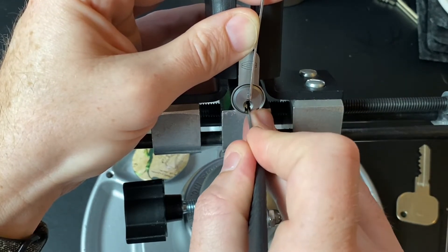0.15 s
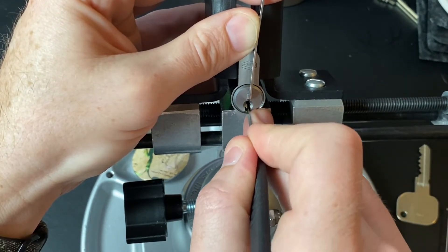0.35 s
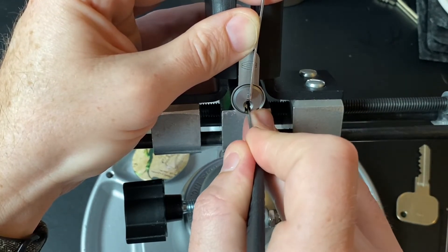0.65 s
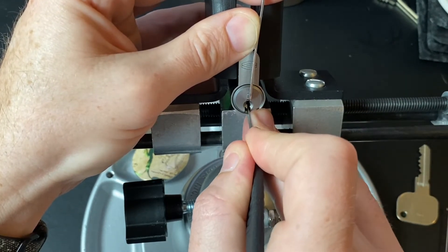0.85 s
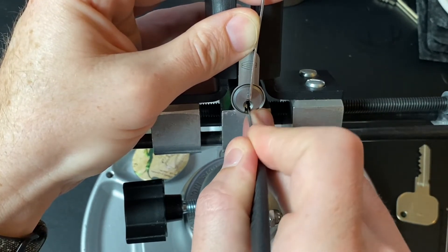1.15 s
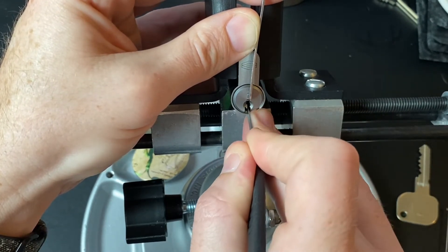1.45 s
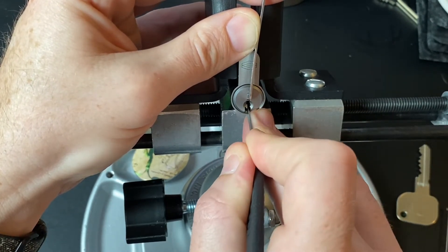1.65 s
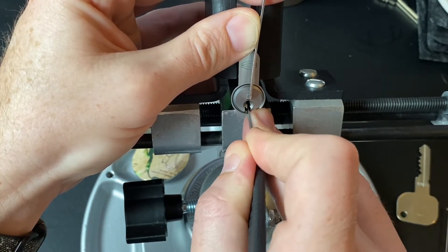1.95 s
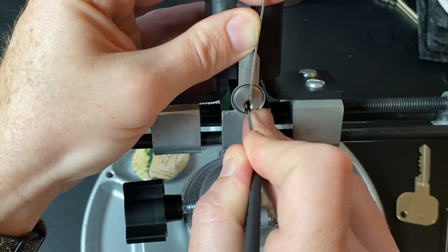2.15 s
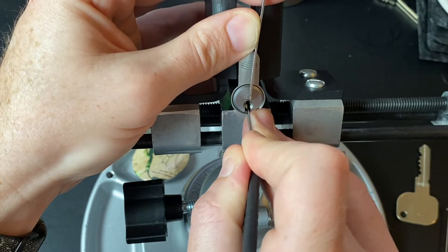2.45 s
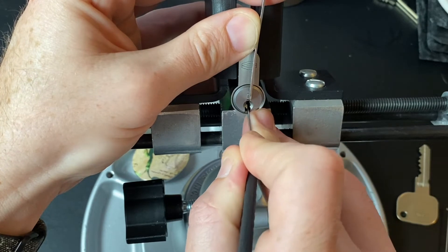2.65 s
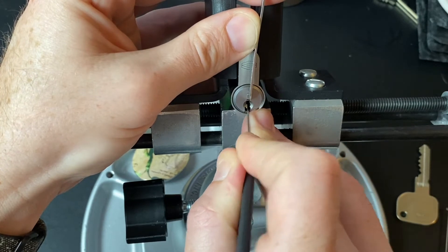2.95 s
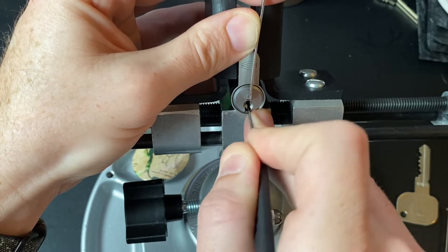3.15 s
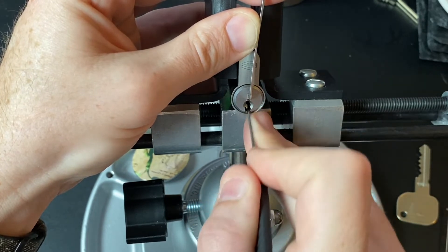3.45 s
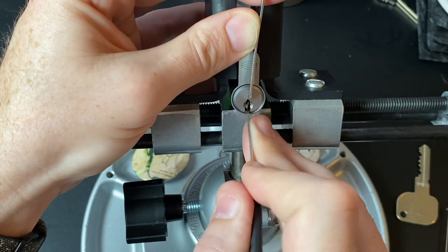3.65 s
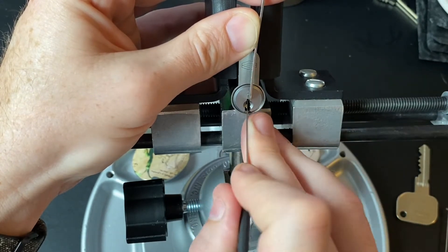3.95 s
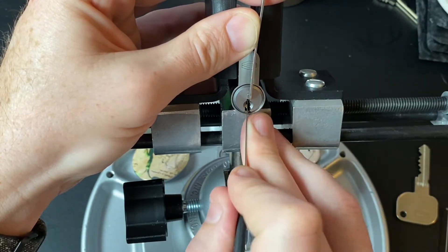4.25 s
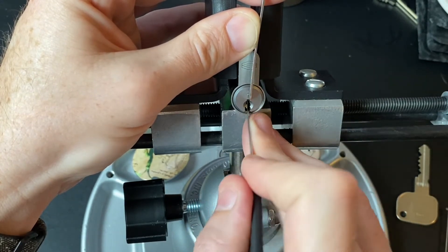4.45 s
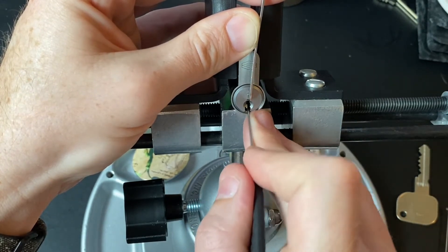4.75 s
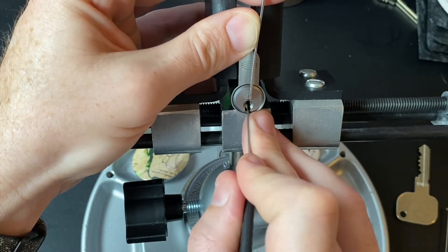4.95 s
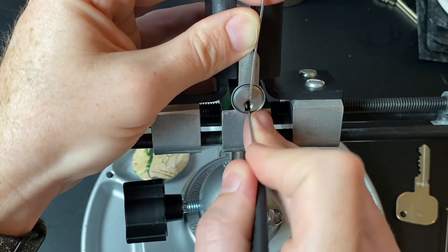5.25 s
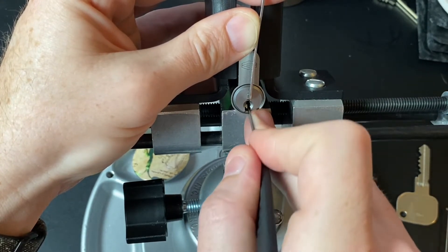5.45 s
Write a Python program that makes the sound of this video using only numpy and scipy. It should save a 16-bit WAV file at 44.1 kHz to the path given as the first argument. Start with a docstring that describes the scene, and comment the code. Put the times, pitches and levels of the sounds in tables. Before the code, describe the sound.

Over a faint fluttering fan-like motor hum, fingers softly bump and slide while a pick touches lock pins. A small crisp snap comes before the middle, then a single dominant metallic clack with a low woody thump. Afterwards come scattered tiny ticks, a light cluster of clicks, and a last modest click near the end. Recorded close in a small, fairly dry room, in stereo.

```python
"""Workbench in a small room: a pick works the pins of a lock cylinder clamped in a small vice.
Faint ticks, a small snap, one loud click as a pin sets, then more ticks: noise cracks and rattles over
swelling steel modes. Three jolts ring vice and bench; fingers slide and bump as shaped noise.
Behind, a small motor, probably a fan, hums as filtered noise. It ticks and pips on every turn,
knocks on every fifth, and slowly hunts in speed."""
import sys
import numpy as np
from scipy import signal
from scipy.fft import rfft, irfft
from scipy.io import wavfile

SR = 44100
rng = np.random.default_rng(int(sys.argv[2]) if len(sys.argv) > 2 else 0)


def digitize_waveform(pressure):
    """Quantize a signal to 16-bit integers and store it at the path in sys.argv[1].

    Rows of a 2-D input are taken as channels; values are limited to [-1, 1].
    """
    field = np.atleast_2d(pressure).T
    bounded = np.clip(field, -1, 1)
    quanta = np.round(bounded * 32767).astype(np.int16)
    wavfile.write(sys.argv[1], SR, quanta)


N = 246519
TIME = np.arange(N) / SR
HZ = np.fft.rfftfreq(N, 1 / SR)


def from_db(db):
    """Decibels to amplitude gain."""
    return 10 ** (np.asarray(db) / 20)


def rms_one(x):
    """Scale to unit rms."""
    return x / np.sqrt(np.mean(x ** 2) + 1e-20)


def noise(gain):
    """Unit-rms Gaussian noise shaped by a gain per frequency bin."""
    spectrum = rfft(rng.standard_normal(N))
    return rms_one(irfft(spectrum * gain, N))


def colour(points):
    """Gain per bin from (Hz, dB) points, interpolated over log frequency."""
    hz, db = np.transpose(points)
    return from_db(np.interp(np.log(HZ + 1), np.log(hz), db))


def add(out, start_s, sound):
    """Mix a short sound in at start_s."""
    start = int(np.clip(round(start_s * SR), 0, N))
    out[start:start + len(sound)] += sound[:N - start]


ECHO_S = 0.0105


def with_echo(x, echo_db):
    """One early reflection from a near surface."""
    return x + from_db(echo_db) * np.interp(TIME - ECHO_S, TIME, x, left=0)


# motor housing resonances: f/Hz, half-width/Hz, level/dB
HOUSING_MODES = [(749, 45, -79.5), (917, 50, -75), (1118, 31, -74.5), (1360, 43, -76.5), (1419, 36, -78),
                 (1929, 50, -85.5), (2111, 27, -85), (2800, 90, -87)]
# steady air rush spectrum: f/Hz, level/dB
RUSH_SPECTRUM = [(20, -20), (45, -3), (145, 1.5), (200, -3.5), (370, -10), (440, -5.5), (650, -11.5),
                 (1250, -5.5), (1700, -14), (2800, -23.5), (3900, -32.5), (6000, -34.5), (9700, -24),
                 (16000, -34)]


def hum(rush_db=-68.0):
    """Moving air: broad noise, plus narrow noise bands where the motor housing rings."""
    out = from_db(rush_db) * noise(colour(RUSH_SPECTRUM))
    for hz, half_width_hz, db in HOUSING_MODES:
        out += from_db(db) * noise(1 / (1 + ((HZ - hz) / half_width_hz) ** 2))
    return out


# mean speed and swing in turns/s; hunt period; time of top speed
MOTOR_HZ, HUNT_HZ, HUNT_S, FASTEST_S = 53.1445, 1.024, 1.83, 0.211
# knock, then the four softer turns: level/dB
TURN_DB = [-48, -60, -63.5, -63, -57]
# knock's place in the round of five; time when it slips one turn earlier
KNOCK_TURN, SLIP_S = 2, 3.85
# knocks that barely catch: t/s
GLANCES_S = [.22, .6, .88, 1.07, 1.36, 1.55, 1.83, 2.48, 2.95, 3.15, 4.82, 5.48]
GLANCE_DB = -6.5


def motor_turns(spread_db=0.24):
    """(s, dB) per turn: sinusoidal speed hunting, strengths repeating in a round of five."""
    swing_turns = HUNT_HZ * HUNT_S / (2 * np.pi)
    angle_turns = MOTOR_HZ * TIME + swing_turns * np.sin(2 * np.pi * (TIME - FASTEST_S) / HUNT_S)
    turn = np.arange(1, int(angle_turns[-1]) + 1)
    turn_s = np.interp(turn, angle_turns, TIME)
    place = (turn - KNOCK_TURN + (turn_s > SLIP_S)) % len(TURN_DB)
    turn_db = np.array(TURN_DB)[place] + spread_db * rng.standard_normal(len(turn_s))
    for glance_s in GLANCES_S:
        turn_db[np.argmin(abs(turn_s - glance_s))] += GLANCE_DB
    return zip(turn_s, turn_db)


# motor tick spectrum: f/Hz, level/dB
TICK_SPECTRUM = [(1000, -8.5), (2000, 1.5), (3000, -2), (4200, -16), (6000, -14.5), (7200, -18), (8600, 1),
                 (9800, -0.5), (12000, -6), (13800, 2), (15500, -14)]


def motor(pip_hz=1250, pip_s=0.0014, tick_db=-65.0, tick_s=0.003, lead_s=0.0042, tick_share=0.38):
    """Each turn: a decaying bright noise tick, then a Gaussian-swelled pip from the housing."""
    pips, ticks = np.zeros((2, N))
    t = TIME[:SR // 50]
    swell = np.exp(-0.5 * ((t - lead_s) / pip_s) ** 2)
    for turn_s, db in motor_turns():
        pitch_hz = pip_hz * (1 + 0.033 * rng.standard_normal())
        pip = swell * np.sin(2 * np.pi * (pitch_hz * t + rng.random()))
        add(pips, turn_s - lead_s, from_db(db) * pip)
        # ticks follow only part of the turn's strength
        this_tick_db = tick_db + tick_share * (db - TURN_DB[0]) + 2.5 * rng.standard_normal()
        add(ticks, turn_s - lead_s, from_db(this_tick_db) * np.exp(-t / tick_s))
    return with_echo(pips, echo_db=-6.0) + ticks * noise(colour(TICK_SPECTRUM))


# fingers sliding along the tool: start/s, end/s, level/dB
SLIDES = [(1.548, 1.636, -81.5), (3.798, 4.22, -72)]
SLIDE_FADE_S, GRIP_DB = 0.043, -88.5
# skin friction spectrum: f/Hz, level/dB
SKIN_SPECTRUM = [(60, -4.5), (200, 5), (500, 3.5), (1000, -13.5), (2500, -13.5), (4300, -16.5),
                 (5500, -18.5), (8000, -26), (16000, -27.5)]
# fingers bumping the vice: t/s, level/dB
BUMPS = [(0.49, -62), (0.691, -64), (1.64, -61.5), (2.063, -57.5), (4.534, -58)]
# dull bump spectrum: f/Hz, level/dB
FLESH_SPECTRUM = [(40, -27), (150, -11), (300, -1.5), (480, -5), (700, -18), (2000, -66)]


def fingers(bump_s=0.0049):
    """Skin friction on the tool as noise swelling with each slide, plus dull noise bumps."""
    slide = np.full(N, from_db(GRIP_DB))
    for start_s, end_s, db in SLIDES:
        outside_s = abs(TIME - np.clip(TIME, start_s, end_s))
        slide += from_db(db) * np.exp(-outside_s / SLIDE_FADE_S)
    bumps = np.zeros(N)
    t = TIME[:SR // 8]
    for bump_start_s, db in BUMPS:
        add(bumps, bump_start_s, from_db(db) * t / bump_s * np.exp(1 - t / bump_s))
    return slide * noise(colour(SKIN_SPECTRUM)) + bumps * noise(colour(FLESH_SPECTRUM))


def ring(modes, spread_db, envelope_power):
    """Modes fed through the clamp: each swells to its peak, then dies; strengths vary per blow."""
    t = TIME[:SR // 4]
    out = np.zeros(len(t))
    for hz, db, peak_s in modes:
        strength = from_db(db + spread_db * rng.standard_normal())
        envelope = (t / peak_s * np.exp(1 - t / peak_s)) ** envelope_power
        out += strength * envelope * np.sin(2 * np.pi * hz * t)
    return out


# pick meets a pin: t/s, level/dB, crack brightness/dB
CLICKS = [(1.158, -61, -19), (1.2994, -70.5, -2), (2.4206, -39.5, -6), (2.7222, -16.5, -2.5),
          (2.9821, -62, 1), (3.142, -68, 5), (3.1628, -62.5, 0), (3.531, -61.5, -6), (4.191, -63.5, -3),
          (4.5041, -65.5, 6), (4.5248, -52, -2.5), (4.546, -55, -13), (4.825, -68.5, 2), (4.854, -69.5, 5),
          (4.876, -55, -20), (5.1398, -64, 3), (5.2632, -69.5, 1.5), (5.387, -47, -5.5),
          (5.399, -55.5, -5.5)]
# lock and tools: f/Hz, level/dB, swell peak/s
STEEL_MODES = [(572, -12.5, 0.0055), (747, -20, .003), (1034, -14.5, 0.0017), (1142, -8.5, 0.0025),
               (1622, -9.5, 0.0036), (1893, 1.5, 0.0045), (2430, -15.5, 0.00067), (2373, -13, 0.0035),
               (2857, -14.5, 0.0036), (3004, -12, 0.0046), (3340, -13, .0025), (3643, -19, .0025),
               (3680, -19.5, 0.0015), (4750, -25, 0.0025), (5980, -25.5, 0.0048)]
# contact crack spectrum: f/Hz, level/dB
CRACK_SPECTRUM = [(200, -22), (700, -3), (1500, -2.5), (3000, -5), (4800, -11), (6000, -6), (7000, -3),
                  (8600, 2), (10500, -1.5), (12500, 0.5), (15000, -3), (17000, -10)]
# pins rattling in their bores, spectrum: f/Hz, level/dB
RATTLE_SPECTRUM = [(500, -22.5), (1400, -11), (1800, 0.5), (2300, 0.5), (3400, -3), (4200, -15.5),
                   (6000, -21), (9000, -36)]
CRACK_S, RATTLE_S = 0.0041, 0.0078  # decay times


def lock(crack_db=5.0, steel_db=-2.5, rattle_db=-5.5):
    """Each contact: a bright noise crack, a short pin rattle and a ring in the steel."""
    crack, rattle, body = np.zeros((3, N))
    t = TIME[:SR // 3]
    crack_shape = np.exp(-t / CRACK_S) * np.minimum(t / 0.0005, 1)
    rattle_shape = np.exp(-t / RATTLE_S) * np.minimum(t / 0.001, 1)
    for click_s, db, bright_db in CLICKS:
        add(crack, click_s, from_db(db + bright_db + crack_db) * crack_shape)
        add(rattle, click_s, from_db(db + rattle_db) * rattle_shape)
        steel = ring(STEEL_MODES, spread_db=1.5, envelope_power=1.25)
        add(body, click_s, from_db(db + steel_db) * steel)
    chatter = crack * noise(colour(CRACK_SPECTRUM)) + rattle * noise(colour(RATTLE_SPECTRUM))
    return body + with_echo(chatter, echo_db=-17.5)


# small room's reflection spectrum: f/Hz, level/dB
ROOM_SPECTRUM = [(40, -5.5), (150, -7), (500, -6), (900, -1), (1900, -7), (3000, -2.5), (4300, 3.5),
                 (7000, -2), (10000, -7.5), (16000, -3)]


def room(x, t60_s=0.24, build_s=0.006):
    """Small room: convolution with a dense noise tail that builds up quickly and soon dies."""
    t = TIME[:SR // 2]
    tail = noise(colour(ROOM_SPECTRUM))[:len(t)]
    tail = tail * from_db(-60 * t / t60_s) * (1 - np.exp(-(t / build_s) ** 2))
    unit_energy_tail = tail / np.sqrt(np.sum(tail ** 2))
    return signal.fftconvolve(x, unit_energy_tail)[:N]


# plug gives under the tension tool, jolting vice and bench: t/s, level/dB
JOLTS = [(2.7237, -18), (4.529, -43), (5.4, -49.5)]
REFERENCE_JOLT_DB = -17
# vice: f/Hz, level/dB, swell peak/s
VICE_MODES = [(275, -13, 0.013), (330, -18.5, 0.011), (493, -1, 0.0067)]
# bench under the vice: f/Hz, level/dB, swell peak/s
BENCH_MODES = [(84, -23, .011), (117.8, -20.5, .011), (140.2, -16.5, 0.017)]
# bench settling, spectrum: f/Hz, level/dB
RUMBLE_SPECTRUM = [(18, -34.5), (40, -9.5), (80, 1), (130, 2), (240, -7), (400, -24), (1500, -62.5)]


def bench(vice_db=1.0, vice_loss=0.38, thump_db=1.5, lag_s=0.0014,
          rumble_db=-23.0, rumble_s=0.029, rumble_keep=0.56):
    """A jolt knocks the vice, then thumps the bench; lighter ones knock less, rumble relatively more."""
    rumble, body = np.zeros((2, N))
    t = TIME[:SR // 3]
    rumble_shape = np.exp(-t / rumble_s) * (1 - np.exp(-t / 0.008))
    for jolt_s, db in JOLTS:
        lighter_db = REFERENCE_JOLT_DB - db
        knock = ring(VICE_MODES, spread_db=0.5, envelope_power=5.8)
        add(body, jolt_s, from_db(db + vice_db - vice_loss * lighter_db) * knock)
        thump = ring(BENCH_MODES, spread_db=1.0, envelope_power=1.0)
        add(body, jolt_s + lag_s, from_db(db + thump_db) * thump)
        this_rumble_db = db + rumble_db + rumble_keep * lighter_db
        add(rumble, jolt_s + lag_s, from_db(this_rumble_db) * rumble_shape)
    return body + rumble * noise(colour(RUMBLE_SPECTRUM))


def scene(room_db=-11.0, room_side_db=-8.0, hum_side_db=-5.0, side_low_hz=450, side_high_hz=2200,
          lock_pan_db=0.7, motor_pan_db=-0.6):
    """Lock close, just left of centre; motor a little right; room and hum spread in the mid band."""
    clicks = lock() + bench()
    near = clicks + from_db(room_db) * room(clicks) + fingers()
    far = motor() + hum()
    side = from_db(room_db + room_side_db) * room(clicks) + from_db(hum_side_db) * hum()
    side_band = signal.butter(1, [side_low_hz, side_high_hz], "band", fs=SR, output="sos")
    side = signal.sosfilt(side_band, side)
    left_right = np.array([[1], [-1]])
    near_pair = near * from_db(left_right * lock_pan_db / 2)
    far_pair = far * from_db(left_right * motor_pan_db / 2)
    return near_pair + far_pair + left_right * side


# microphone pair: f/Hz, left lead/rad
MIC_PHASE = [(0, 0), (1400, 0), (2500, .5), (3200, .2), (5400, .3), (7200, 3.1), (10000, 6.2), (10900, 6.4),
             (13500, 9.4), (16000, 12)]
CUTOFF_HZ = 15900


def record(dry):
    """Two spaced ports: treble reaches them out of step; an elliptic low-pass cuts the top."""
    lead_rad = np.interp(HZ, *np.transpose(MIC_PHASE))
    ports = np.array([np.ones(len(HZ)), np.exp(-1j * lead_rad)])
    pair = irfft(rfft(dry) * ports, N)
    low_pass = signal.ellip(10, 0.3, 80, CUTOFF_HZ, fs=SR, output="sos")
    return signal.sosfilt(low_pass, pair)


dry = scene()
out = record(dry)
digitize_waveform(out)
```